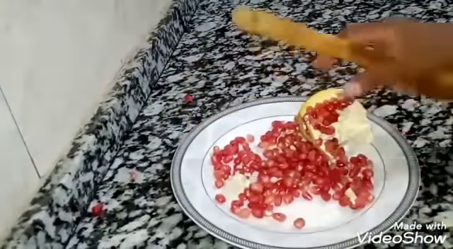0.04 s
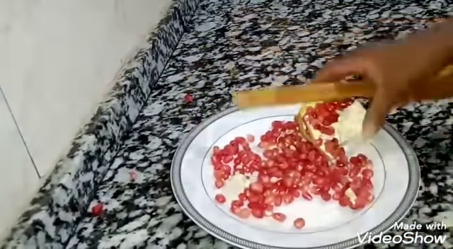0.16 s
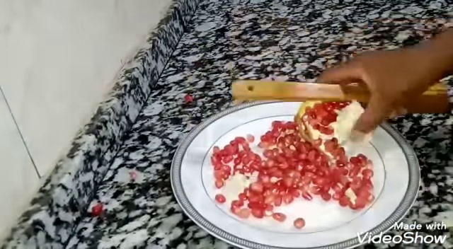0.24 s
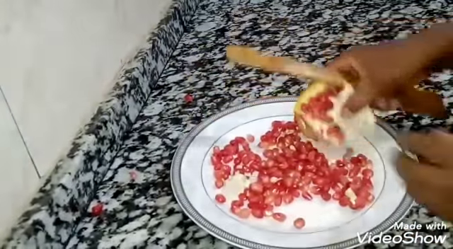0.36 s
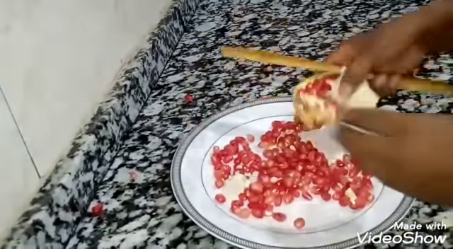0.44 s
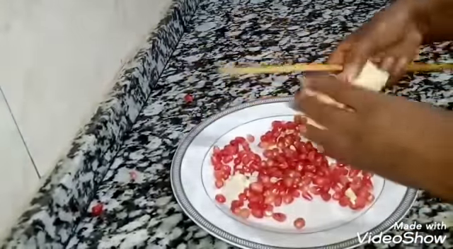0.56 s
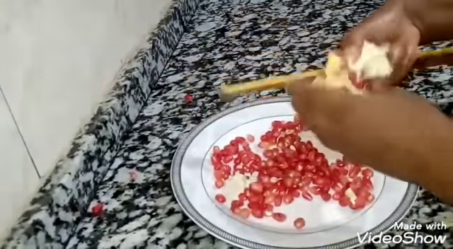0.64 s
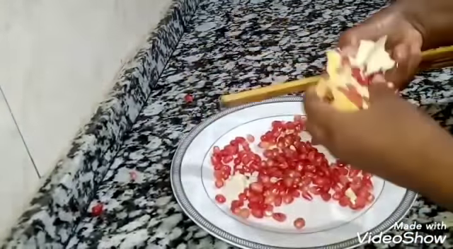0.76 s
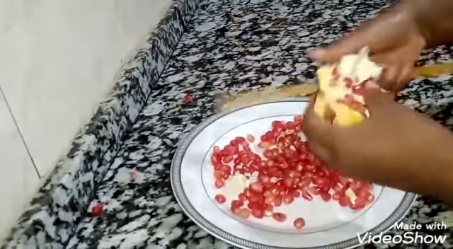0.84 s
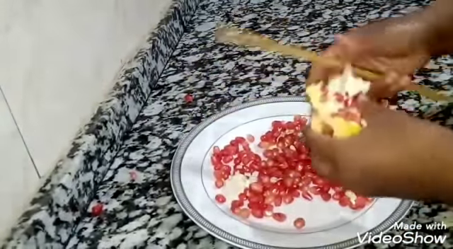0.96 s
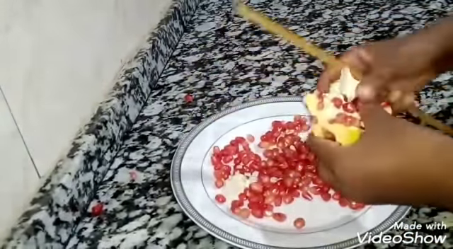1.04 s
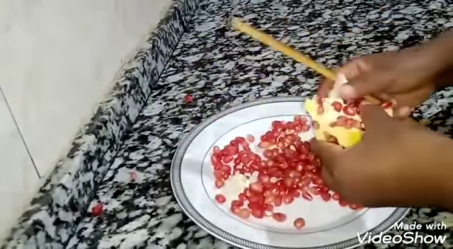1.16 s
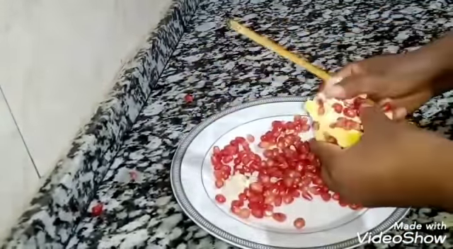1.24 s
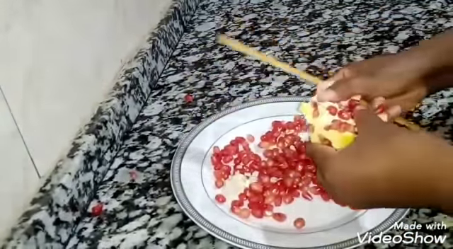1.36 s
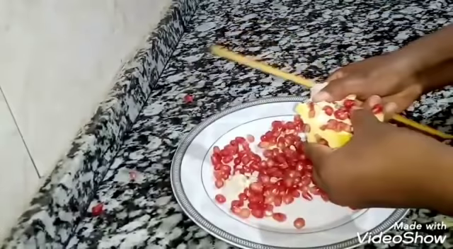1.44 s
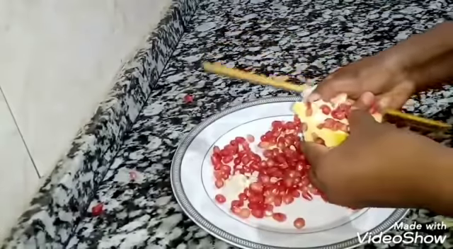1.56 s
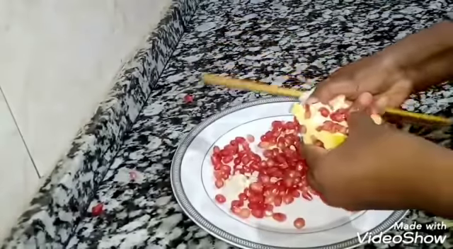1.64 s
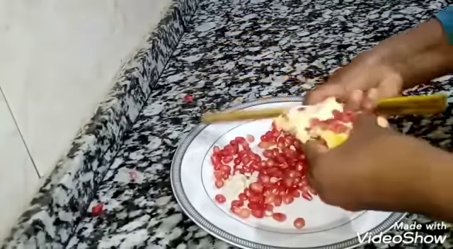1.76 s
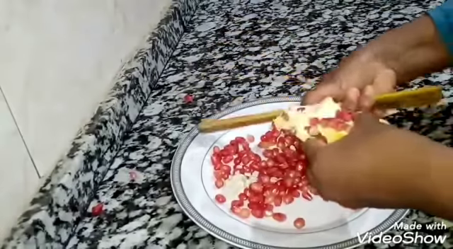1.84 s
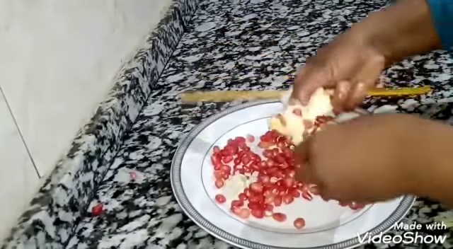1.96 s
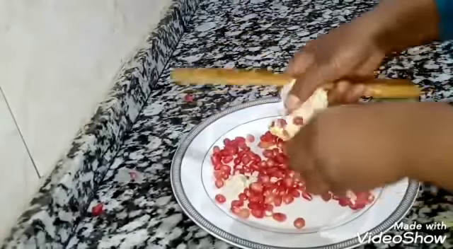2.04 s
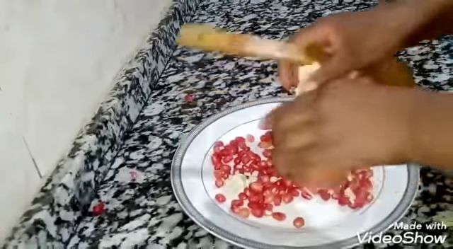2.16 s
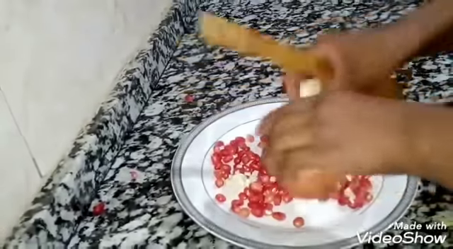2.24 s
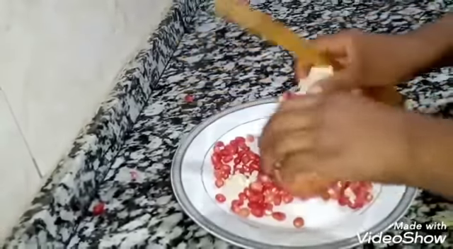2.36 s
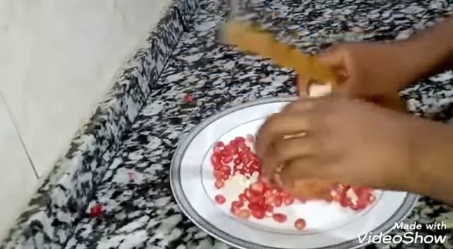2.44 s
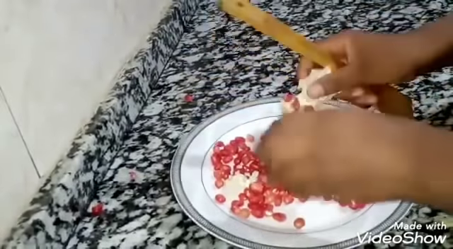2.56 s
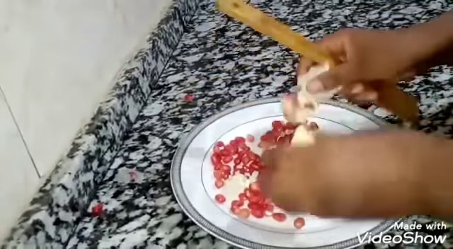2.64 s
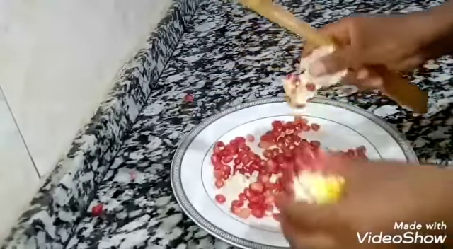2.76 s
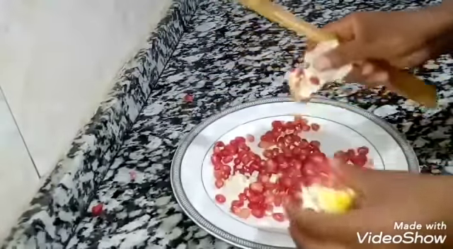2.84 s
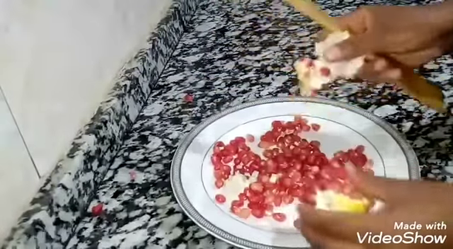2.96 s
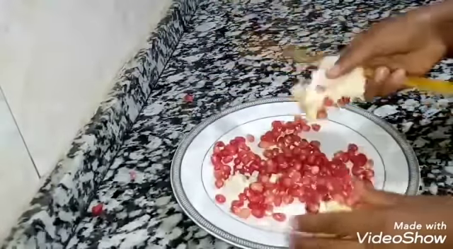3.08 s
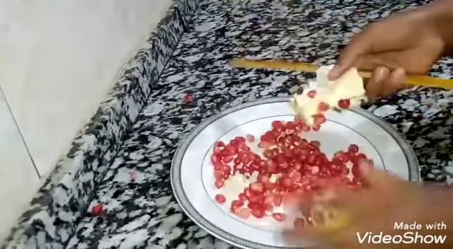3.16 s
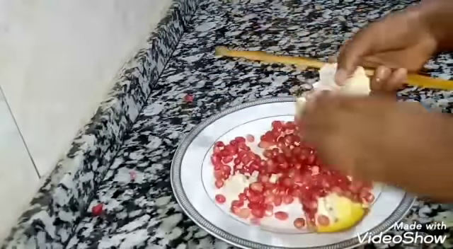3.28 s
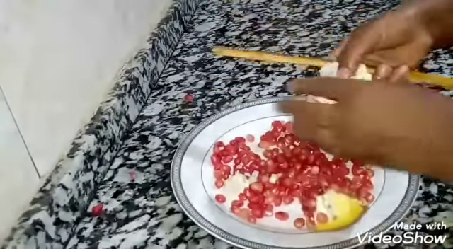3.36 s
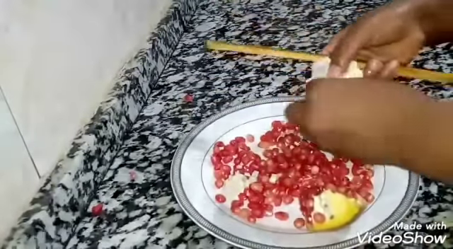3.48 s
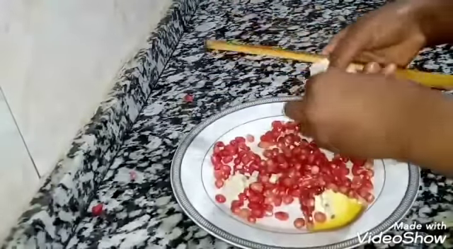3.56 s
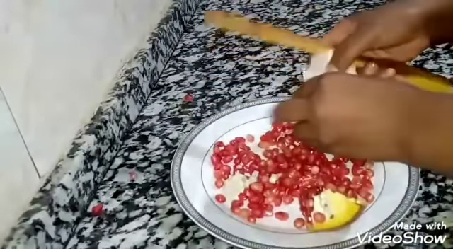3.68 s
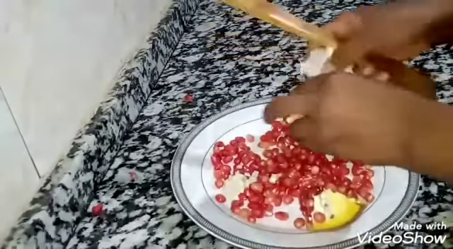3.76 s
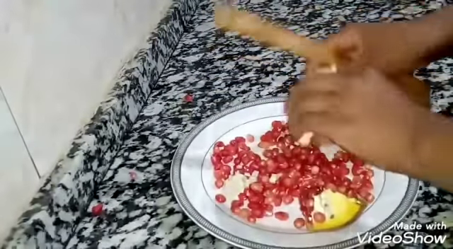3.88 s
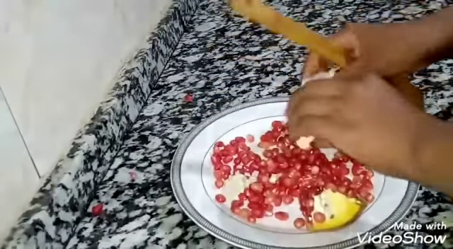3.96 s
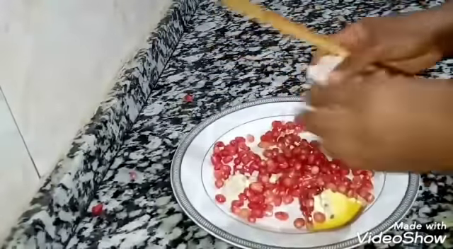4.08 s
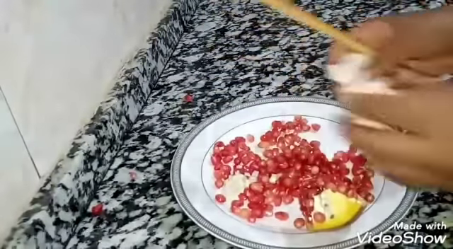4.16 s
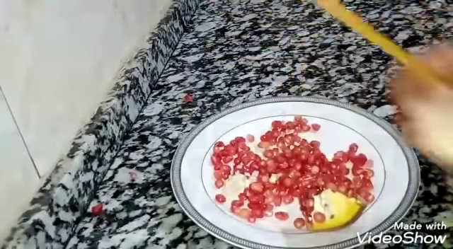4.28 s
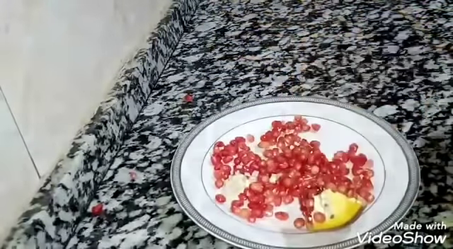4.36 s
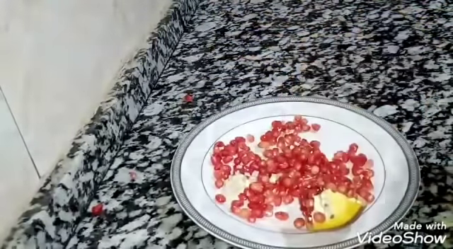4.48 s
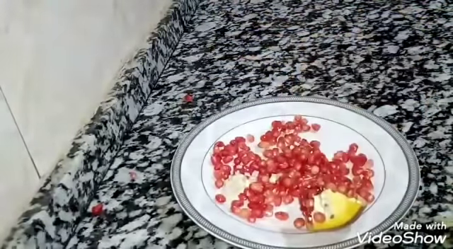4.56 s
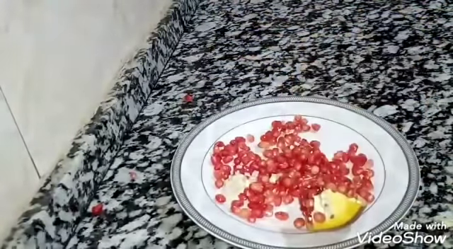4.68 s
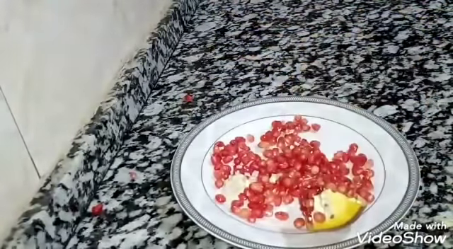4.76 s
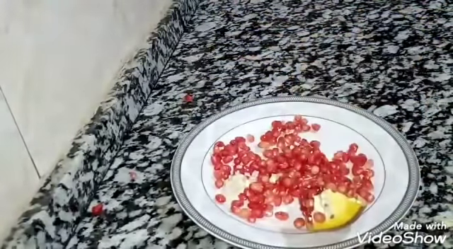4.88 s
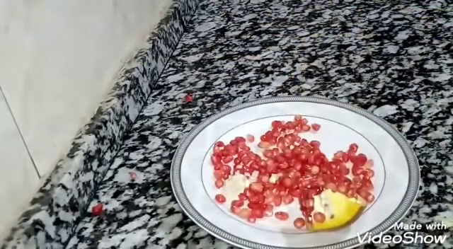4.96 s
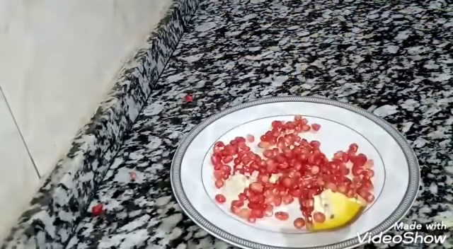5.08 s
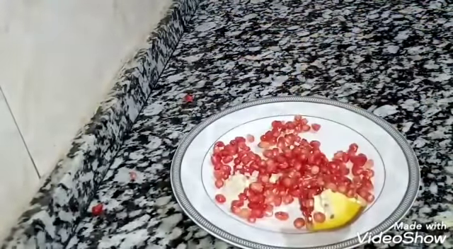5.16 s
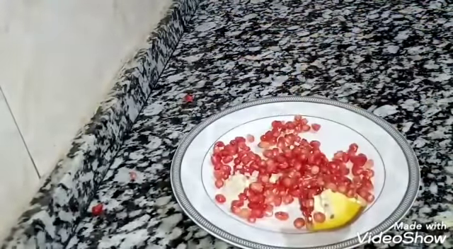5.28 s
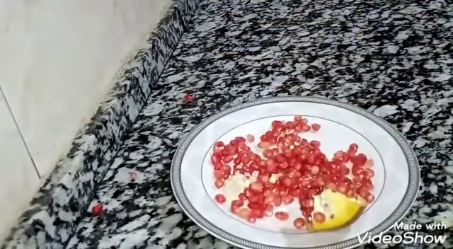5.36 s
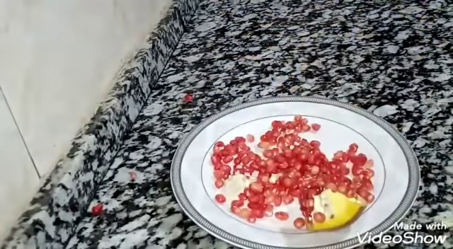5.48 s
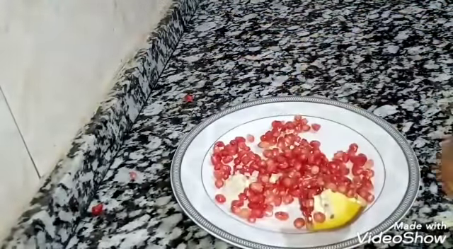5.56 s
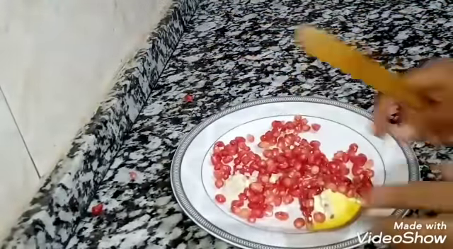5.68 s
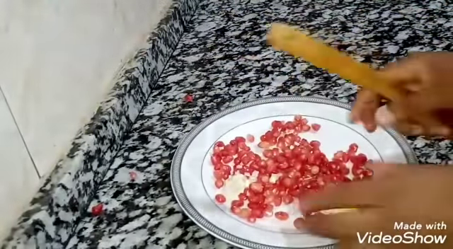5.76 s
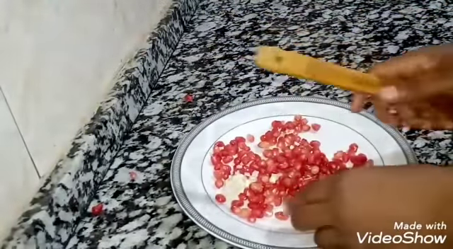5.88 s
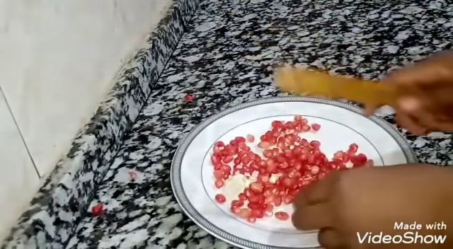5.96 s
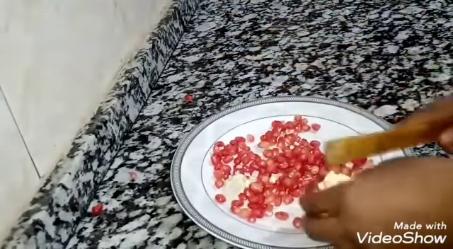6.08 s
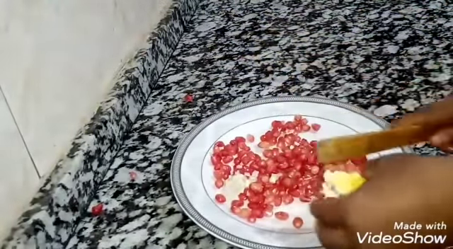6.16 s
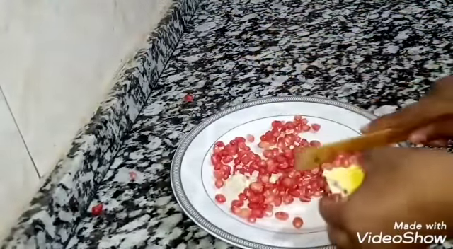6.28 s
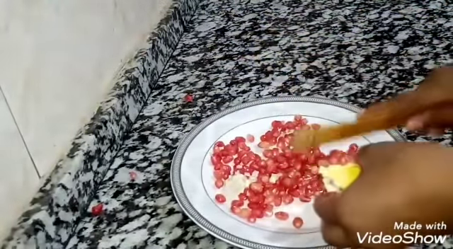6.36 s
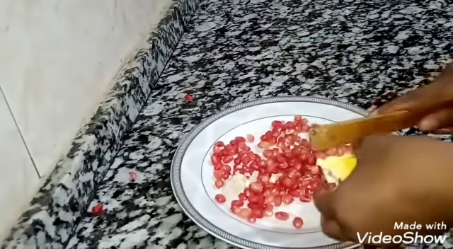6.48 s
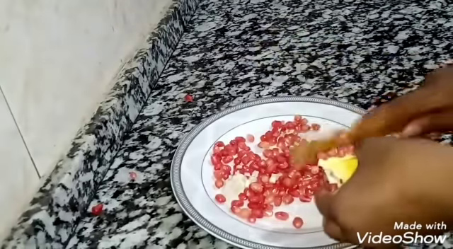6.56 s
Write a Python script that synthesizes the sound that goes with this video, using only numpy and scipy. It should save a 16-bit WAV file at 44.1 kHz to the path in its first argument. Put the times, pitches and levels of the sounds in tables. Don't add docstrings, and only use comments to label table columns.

```python
import sys
import numpy as np
from scipy import signal
from scipy.fft import rfft, irfft
from scipy.io import wavfile
from scipy.ndimage import uniform_filter1d

SR = 44100
rng = np.random.default_rng(int(sys.argv[2]) if len(sys.argv) > 2 else 0)


def unload_audio(sound):
    columns = np.transpose(np.atleast_2d(sound))
    steps = np.round(np.clip(columns, -1, 1) * 32767)
    wavfile.write(sys.argv[1], SR, steps.astype(np.int16))


def gain_from_db(level_db):
    decades = np.asarray(level_db, float) / 20
    return 10 ** decades


N = 291833


def noise(count=N):
    return rng.standard_normal(count)


def unit(x):
    return x / np.sqrt(np.mean(x ** 2))


def band(x, hz, width):
    return signal.lfilter(*signal.iirpeak(hz, hz / width, fs=SR), x)


def walk(rate):
    hold = int(SR / rate)
    held = np.repeat(noise(N // hold + 1), hold)
    return 1.8 * uniform_filter1d(uniform_filter1d(held, hold), hold)[:N]


def bands(modes, flicker_db=3.5):
    total = np.zeros(N)
    for hz, width, db in modes:
        flicker = gain_from_db(db + flicker_db * walk(9))
        total += flicker * unit(band(band(noise(), hz, width), hz, width))
    return unit(total)


def colour(x, points):
    hz, db = np.transpose(points)
    log_hz = np.log(np.maximum(np.arange(N // 2 + 1) * SR / N, 1))
    return irfft(rfft(x) * gain_from_db(np.interp(log_hz, np.log(hz), db)), N)


def swell(s, db, rise_s, fall_s):
    out = np.zeros(N)
    i = np.arange(max(int((s - 2 * rise_s) * SR), 0), min(int((s + 2 * fall_s) * SR), N))
    t = i / SR - s
    out[i] = gain_from_db(db - 30 * np.maximum(-t / rise_s, t / fall_s))
    return out


def swells(rows):
    return sum(swell(*row) for row in rows)


def add(out, s, x, db):
    i = int(s * SR)
    x = x[:N - i]
    out[i:i + len(x)] += x * gain_from_db(db) / np.abs(x).max()


def house():
    # frequency in Hz, level in dB per Hz.
    hiss_points = [(18, -37), (35, -25), (146, -2), (388, -16), (814, -20.5), (1120, -15.5), (1890, -6),
                   (2890, -18), (6900, -12), (9480, -34), (13800, -32), (14900, -24.5), (15900, -24.5),
                   (16300, -47)]
    # centre in Hz, width in Hz, level in dB.
    rumble = [(85.4, 50, -6.5), (147, 37, -2.5), (240.4, 78, -0.5)]
    middle = [(390, 220, -3.5), (623, 230, -6.5), (860, 380, -3)]
    whistle = [(1872, 180, 8.5), (2026, 100, 0.5)]
    # peak in seconds, rumble in dB, middle in dB.
    stirs = [(0.2, -77, -77), (0.419, -73.5, -81.5), (2.45, -71, -85), (2.74, -99, -92),
             (3.239, -72.5, -86), (3.78, -77, -85), (4.351, -79, -95), (4.9, -80, -71.5), (5.0, -81, -102),
             (5.47, -73.5, -79), (5.729, -81, -78), (6.141, -80.5, -113), (6.269, -75, -78)]
    rise_s, fall_s = 0.5, 0.26
    hiss = unit(colour(noise(), hiss_points)) * gain_from_db(-72 + 0.15 * walk(3))
    low = gain_from_db(-81) + swells((s, db, rise_s, fall_s) for s, db, _ in stirs)
    mid = gain_from_db(-78.5) + swells((s, db, rise_s, fall_s) for s, _, db in stirs)
    fan = bands(whistle, 2.5) * gain_from_db(-69 + 0.4 * walk(2.1))
    return hiss + low * bands(rumble) + mid * bands(middle, 3.1) + fan


def counter(blows, wide, rise_s):
    out, t = np.zeros(N), np.arange(SR // 2) / SR
    for s, db, hz, t60 in blows:
        shove = noise(len(t)) * gain_from_db(-60 * t / t60) * np.minimum(t / rise_s, 1)
        add(out, s, band(band(shove, hz, wide * hz), hz, wide * hz), db)
    return out


def thuds():
    # start in seconds, peak in dB, pitch in Hz, t60 in seconds.
    blows = [(.300, -59, 63.4, 0.12), (0.305, -51.5, 140, 0.018), (.31, -59, 352, 0.4),
             (3.225, -58, 1360, 0.13), (0.401, -56, 120, 0.11), (0.689, -52, 523, 0.14),
             (1.258, -56, 318, 0.2), (1.548, -44, 990, 0.14), (1.769, -45, 423, 0.058),
             (2.043, -52.5, 510, 0.35), (2.451, -33.5, 538, 0.12), (2.778, -59.5, 420, 0.19),
             (3.612, -60, 139, 0.11), (4.847, -57.5, 149, 0.42), (4.922, -71, 152.6, .28),
             (4.93, -57.5, 354, 0.17), (5.698, -60.5, 390, 0.66), (6.146, -63, 109, 0.41),
             (6.279, -59, 114, 0.21), (6.59, -52, 460, 0.4), (2.455, -53, 1900, 0.31)]
    return counter(blows, wide=0.35, rise_s=0.0093)


def hums():
    # start in seconds, peak in dB, pitch in Hz, t60 in seconds.
    blows = [(1.175, -52, 4400, .16), (2.456, -34, 1500, .17), (.345, -44, 1700, .12),
             (0.54, -59, 2090, 0.92), (0.57, -60, 740, 0.25), (3.087, -53, 135, 0.43),
             (3.09, -58.5, 1206, 0.19), (2.452, -40, 498, 0.28), (3.614, -53, 1020, 0.24),
             (1.55, -55.5, 540, 0.2), (.36, -55.5, 890, 0.114)]
    return counter(blows, wide=0.34, rise_s=0.00086)


def clear_knocks():
    # start in seconds, peak in dB, pitch in Hz, t60 in seconds.
    blows = [(2.1285, -41, 1650, 0.054), (2.3435, -49, 1660, .05), (3.082, -43, 1780, 0.025),
             (.592, -40, 2130, 0.022), (.592, -49, 3220, .03), (5.905, -65, 3500, 0.31),
             (2.518, -47, 545, .3), (.5925, -47, 395, 0.11), (.5935, -57, 125, 0.3),
             (.61, -59.5, 388, 0.61), (.675, -54, 690, 0.24), (.68, -58, 830, 0.66),
             (.70, -60.5, 480, 0.33)]
    out, t = np.zeros(N), np.arange(SR // 2) / SR
    for s, db, hz, t60 in blows:
        waver = unit(uniform_filter1d(uniform_filter1d(noise(len(t)), size=500), size=500))
        note = np.sin(2 * np.pi * np.cumsum(hz * (1 + 0.02 * waver)) / SR)
        onset = np.minimum(t * hz / 2, 1)
        add(out, s, note * gain_from_db(-60 * t / t60) * onset, db)
    return out


def slaps():
    # start in seconds, peak in dB, contact in ms.
    hits = [
        (2.4505, -23.5, 0.44),
        (2.4531, -30, 0.26),
        (2.457, -20.5, 0.52),
        (2.467, -31, .4),
        (3.0835, -58, .35),
    ]
    out, t_ms = np.zeros(N), np.arange(900) * 1000 / SR
    for s, db, contact_ms in hits:
        push = -np.sin(np.pi * np.minimum(t_ms / contact_ms, 1)) ** 2
        add(out, s, band(push, 1400, 2500), db)
    return out


def drag():
    # peak in seconds, squeal in dB, rise in seconds, fall in seconds, body re squeal in dB.
    strokes = [
        (0.594, -58, 0.0037, 0.2, -13),
        (0.69, -61, 0.27, 0.19, -4),
        (0.851, -65, 0.34, 0.36, -1.5),
        (5.74, -74.5, .5, 0.35, -5),
    ]
    # centre in Hz, width in Hz, level in dB.
    squeal = [(2230, 600, 1.5), (3300, 500, -7), (4100, 600, -4)]
    body = [(420, 130, -2.5), (781, 210, -1)]
    squeal_gain = swells(row[:4] for row in strokes)
    body_gain = sum(swell(*row[:4]) * gain_from_db(row[4]) for row in strokes)
    return squeal_gain * bands(squeal, 1.1) + body_gain * bands(body, 1.3)


def squeak():
    # peak in seconds, level in dB, rise in seconds, fall in seconds.
    rubs = [
        (5.76, -71.5, 0.32, 0.2),
        (5.925, -67, 0.069, 0.055),
    ]
    return swells(rubs) * bands([(2620, 590, -3.0), (3484, 80, 0.0), (4360, 520, -4)], 3.6)


def rustle():
    # peak in seconds, level in dB, rise in seconds, fall in seconds.
    touches = [(0.233, -62, 0.031, 0.4), (0.765, -69.5, 0.053, 0.36), (.85, -76, 0.22, 0.037),
               (1.171, -72, 0.029, 0.3), (1.255, -70, 0.027, 0.082), (1.5, -69, 0.0066, 0.0089),
               (1.54, -50, 0.044, 0.019), (2.348, -66.5, 0.011, 0.13), (2.437, -65, 0.043, 0.05),
               (2.466, -59.5, 0.012, .16), (3.087, -60, 0.058, 0.16), (3.473, -64.5, 0.05, 0.12),
               (3.56, -48.5, 0.029, 0.25), (3.63, -60.5, .02, 0.154), (4.82, -73, 0.05, 0.046),
               (4.922, -64, 0.063, 0.038), (5.746, -76.5, 0.35, 0.24), (5.92, -76, 0.33, 0.11),
               (6.25, -64, 0.16, 0.089), (6.548, -61, 0.059, 0.29)]
    grains = noise() * gain_from_db(1.7 * rng.exponential(size=N) + 2.4 * walk(90))
    for hz, width in [(5000, 2600), (5800, 3000), (6300, 3200), (6600, 3600)]:
        grains = band(grains, hz, width)
    return unit(grains) * swells(touches)


def plate(hits, mode_hz, modes, clack_hz, clack_width, clack_db, rough, longest_s):
    out, t = np.zeros(N), np.arange(SR // 3) / SR
    hz = np.array(mode_hz)[:, None]
    db, t60 = np.array(modes).T[:, :, None]
    decay = gain_from_db(-60 * t / np.clip(t60, 0.02, longest_s))
    for s, peak_db, bass_db, treble_db in hits:
        level_spot, pitch_spot = rng.standard_normal((2, len(modes), 1))
        tilt_db = np.interp(hz, [800, 1100, 2200, 2600], [bass_db, 0, 0, treble_db])
        share = gain_from_db(db + 1.5 * level_spot + tilt_db)
        ring = np.sin(2 * np.pi * hz * (1 + 0.003 * pitch_spot) * t) * decay
        chatter = 1 + rough * unit(uniform_filter1d(rng.standard_normal(ring.shape), size=300, axis=1))
        rung = (share * ring * chatter).sum(axis=0)
        rattle = noise(len(t)) * np.exp(-t * 1000 / 1.7)
        clack = band(band(rattle, clack_hz, clack_width), clack_hz, clack_width)
        onset = np.minimum(t / 0.00039, 1) ** 2
        add(out, s, (rung + gain_from_db(clack_db) * clack) * onset, peak_db)
    return out


def falling_seeds():
    # start in seconds, peak in dB, bass tilt in dB, treble tilt in dB.
    hits = [
        (1.914, -48.5, -17, 7),
        (2.012, -44.5, -7.5, -6),
        (2.044, -46.5, -33, -3.5),
        (2.060, -45, -1, -18),
        (2.071, -49, 17, 2),
        (2.128, -40.5, -32, -21),
        (2.166, -67, -16, -5),
        (2.344, -44.5, -3, -34),
        (3.081, -46.5, -11, -7),
        (3.222, -55, -17, -11),
    ]
    heap_hz = [415, 500, 580, 665, 1200, 1380, 1555, 1660, 1900, 2690, 2730, 3870, 4400]
    # level in dB, t60 in seconds.
    heap = [(-0.5, 0.11), (3.5, 0.35), (1.5, 0.22), (-27, 0.3), (-3, 0.06), (-2, 0.049), (6.5, 0.11),
            (11.5, 0.054), (2.5, 0.056), (-7, 0.11), (4.5, 0.1), (-21, 0.3), (-8, 0.04)]
    return plate(hits, heap_hz, heap, 1760, 510, clack_db=7.5, rough=0.44, longest_s=0.28)


def falling_rind():
    # start in seconds, peak in dB, bass tilt in dB, treble tilt in dB.
    hits = [
        (1.750, -32.5, -6.5, -12),
        (1.773, -56, 13, -12),
        (2.4485, -37, -12, 5),
        (2.451, -26.5, 0, 4),
        (2.457, -24, 4.5, -3.5),
        (2.469, -32.5, -2, -3),
        (2.478, -38.5, 14, 11),
        (2.520, -39.5, 3, -20),
        (3.083, -42, -9, -0.5),
    ]
    rim_hz = [440, 538, 586, 720, 900, 1045, 1212, 1260, 1475, 1560, 1688, 1865, 2050, 2690, 2749, 3540,
              4390, 4865, 5340, 6374, 7500, 8576, 10000]
    # level in dB, t60 in seconds.
    rim = [(-4.5, 0.11), (5.5, 0.14), (-4, 0.073), (-5, 0.05), (-29, 0.056), (5, 0.082), (1.5, 0.16),
           (-15.5, 0.09), (0, 0.1), (-2, 0.146), (1, 0.18), (-9.5, 0.071), (-1, 0.16), (2.5, 0.11),
           (5, 0.1), (-16, 0.28), (-4, 0.16), (-9, 0.22), (-15, 0.29), (-9.5, 0.38), (-12, 0.3),
           (-12.5, 0.15), (-20, 0.23)]
    return plate(hits, rim_hz, rim, 1880, 1300, clack_db=12.5, rough=0.89, longest_s=0.33)


def spits():
    # start in seconds, peak in dB.
    clicks = [(0.3058, -48.5), (0.3228, -46.5), (0.3335, -38.5), (0.3555, -40.5), (1.791, -49.5),
              (1.2355, -45), (1.2522, -45.5), (1.4958, -61), (1.5473, -44), (1.7507, -50.5), (3.6108, -52),
              (6.577, -50), (6.5982, -52.5)]
    out, t = np.zeros(N), np.arange(512) / SR
    for s, db in clicks:
        add(out, s, band(noise(512) * np.exp(-t / 0.002), 13500, 6000), db)
    return out


def rind_knock(x, hz, width):
    return band(band(band(x, hz, width), hz, width), hz, 3.2 * width)


def cracks():
    # peak time in seconds, peak in dB, rind re peak in dB, rind in Hz.
    rip = [(0.2313, -45.5, -14.5, 2600), (0.272, -53, -15, 2608), (0.3054, -27, -9, 2693),
           (0.3135, -26.5, -11.5, 3300), (0.3178, -26.5, -14, 2498), (0.3233, -26, -8, 3704),
           (0.3335, -13, -16, 2400), (0.3352, -27, -3, 2493), (0.3384, -28.5, -2.5, 3510),
           (0.3413, -20, -18, 2600), (0.3435, -30.5, -8.5, 2800), (0.3485, -31, -7, 2400),
           (0.352, -31.5, -6, 2000), (0.3535, -31.5, -9, 3400), (0.3564, -31.5, -6.5, 2192),
           (0.3577, -29.5, -6, 3600), (0.36, -33.5, -8.5, 2400), (0.3624, -24.5, -10.5, 3200)]
    # peak time in seconds, peak in dB, bright ring in Hz, rind re peak in dB.
    ribs = [(1.5433, -41.5, 6500, 0), (1.5444, -29.5, 7200, -4), (1.547, -23.5, 5010, -0.5),
            (1.5488, -27.5, 5500, -1.5), (1.549, -32, 6056, 2.5), (1.553, -32.5, 4900, -10),
            (1.5546, -36.5, 5130, -3), (1.7502, -21.5, 4950, -12), (1.7518, -25, 5330, -13),
            (1.7513, -30, 4800, -5), (1.7557, -24.5, 5250, -11.5), (1.756, -32, 5150, -2.5),
            (1.773, -23.5, 5990, -14), (1.7742, -27.5, 7400, -12.5), (1.7761, -28, 5570, -0.5),
            (1.7773, -41, 5320, -5), (3.5379, -28, 6190, -14), (3.538, -29, 5130, -9),
            (3.5421, -35.5, 4760, -16), (3.5475, -42, 5500, -5), (3.5551, -48, 6700, 1),
            (3.6111, -27, 6310, -10), (3.6125, -27, 6100, -8), (3.6127, -26, 5976, 0),
            (3.6172, -41, 6500, -12), (3.6283, -32.5, 5500, -11), (3.6354, -40, 6070, -9)]
    # peak time in seconds, peak in dB, bright ring in Hz, rind re peak in dB, rind in Hz.
    ticks = [(0.5935, -51.5, 3250, 9, 2190), (1.472, -51.5, 6870, -10, 2400),
             (1.4961, -43.5, 7340, -20, 2360), (1.6578, -41.5, 5400, -0.5, 3470),
             (1.6595, -45, 6570, -4, 2700), (1.7038, -45.5, 6920, 1, 5300), (2.2622, -42, 7280, -38, 2350),
             (2.345, -51, 5880, -17, 2420), (3.0843, -52.5, 6150, 11, 1800), (3.096, -60, 5120, -7, 2400),
             (3.4692, -48, 6340, -8, 4530), (3.7328, -53, 6200, -3, 2400), (4.8246, -55, 5290, -8.5, 2370),
             (4.9158, -51.5, 6420, -3, 4000), (5.912, -62, 4150, 4, 2395), (6.2155, -67, 6040, -12, 2400),
             (6.2325, -63, 5870, -1, 2400)]
    peel = [(1.1639, -46.5, 6730, -9, 4570), (1.1706, -46.5, 6830, -12, 4500), (1.1771, -63, 6800, 4, 4350),
            (1.1805, -56, 6940, -3, 4400), (1.184, -51, 6720, 0, 4400), (1.1985, -53, 6630, -8, 4440),
            (1.2016, -52, 6370, -3, 4600), (1.2114, -52, 6600, -12, 4400), (1.2247, -49, 6420, -13, 4600),
            (1.2354, -37, 6500, -12, 4700), (1.244, -47, 6160, -8, 4600), (1.2515, -36, 6000, -6, 4100),
            (1.2539, -38, 6110, -6, 3000), (1.2543, -47, 6290, -8, 3400), (1.2699, -46, 6370, -12, 3000),
            (1.272, -40.5, 5810, 0, 2400), (1.2753, -39, 4500, -11, 2300), (1.2757, -39, 6700, -2, 3600),
            (1.2779, -33, 6630, -6, 1960), (1.2816, -37, 5940, -15, 2000), (1.2899, -36.5, 6180, -5, 3190),
            (1.291, -47, 6640, -9, 3600), (1.2976, -48, 6210, -2, 3500), (1.3183, -35, 6590, 1.5, 2400),
            (1.3208, -44.5, 6710, 3, 1920), (1.3286, -46, 6970, 7.5, 3600), (1.331, -47.5, 6150, 5, 2310),
            (1.3336, -47.5, 5470, 6, 2800), (6.5424, -39.5, 6370, -34.5, 2400), (6.568, -43, 6330, 0, 2150),
            (6.5753, -36.5, 6490, -6, 2630), (6.578, -38, 5220, -6, 2930), (6.5793, -39, 6260, -5, 2840),
            (6.584, -42, 6240, -0.5, 1980), (6.5887, -48, 6660, -16, 2400), (6.5989, -39.5, 6275, 8, 2320),
            (6.6006, -49, 5700, 14, 2130), (6.6054, -39, 6000, 2, 2280), (6.6078, -47, 6720, -2, 2630),
            (6.6112, -44, 6400, -4, 2150)]

    # rind width as a share of its pitch, tear time in ms, level at the walls in dB.
    rows = [(s, db, 6185, rind_db, rind_hz, 0.84, 0.17, -4) for s, db, rind_db, rind_hz in rip]
    rows += [(*row, 2380, 1, 0.17, 2) for row in ribs]
    rows += [(*row, 0.45, 0.27, -2) for row in ticks]
    rows += [(*row, 1, 0.17, 3) for row in peel]

    out, walls, t = np.zeros(N), np.zeros(N), np.arange(512) / SR
    for s, db, hz, rind_db, rind_hz, wide, tear_ms, walls_db in rows:
        tear, bend, spray = rng.standard_normal((3, 512))
        hz = hz * (1 + 0.012 * spray[-1])
        rind_width = wide * rind_hz
        shape = (t * 1000 / tear_ms) ** 2 * np.exp(-t * 1000 / tear_ms)

        ripping = (np.sin(2 * np.pi * hz * t) + 0.35 * tear) * shape
        fibres = band(band(ripping, hz, 3000), hz, 6000)
        start = s - np.abs(fibres).argmax() / SR
        add(out, start, fibres + gain_from_db(-35.5) * tear * shape, db)

        bending = (np.sin(2 * np.pi * rind_hz * t) + 0.9 * bend) * shape
        lag_s = 0.0005
        add(out, start + lag_s, rind_knock(bending, rind_hz, rind_width), db + rind_db)

        puff = spray * np.exp(-t / 0.00025)
        add(walls, start, band(band(puff, hz, 3600), hz, 7000), db + walls_db + 2.5)
        add(walls, start, rind_knock(puff, rind_hz, rind_width), db + rind_db + walls_db - 2)
    return out, walls


def kitchen(x):
    # centre in Hz, t60 in seconds, level in dB.
    echoes = [(405, 0.32, -10), (1060, 0.25, -13), (2050, 0.31, -13.5), (3570, .3, -10), (5100, 0.28, -9),
              (6500, 0.15, -16.5), (9610, 0.12, -13.5), (15190, 0.048, 6.5)]
    t = np.arange(SR // 2) / SR
    tail = np.zeros(len(t))
    for hz, t60, db in echoes:
        tail += gain_from_db(db - 31.0 - 60 * t / t60) * unit(band(noise(len(t)), hz, 0.96 * hz))
    rise = np.clip((t - 0.001) / 0.004, 0, 1)
    return signal.fftconvolve(x, tail * rise)[:N]


def microphone(x):
    # frequency in Hz, gain in dB.
    response = [(20, -22.5), (200, -2), (400, -2.5), (3500, 0.5), (6300, 0.5), (7400, 2), (8700, -4),
                (11500, -11), (14000, -13.5), (15500, 4.5), (16400, -27.5)]
    return colour(x, response)


def scene():
    snaps, scattered = cracks()
    rind, seeds = falling_rind(), falling_seeds()
    echoes = kitchen(scattered + gain_from_db(-6.5) * rind + gain_from_db(-2.5) * seeds)
    near = microphone(snaps + rind + seeds + echoes)
    slab = thuds() + hums() + clear_knocks() + slaps()
    hands = drag() + rustle() + squeak()
    return (near + slab + hands + house() + spits())[None]


def starve(x, low_hz, high_hz, share):
    f, _, z = signal.stft(x, SR, nperseg=2048)
    for lo in np.arange(low_hz, high_hz, 86.0):
        rows = (f >= lo) & (f < lo + 86)
        whim = gain_from_db(9 * uniform_filter1d(noise(z.shape[1]), size=2))
        need = np.sum(np.abs(z[rows]) ** 2, axis=0) * whim
        z[rows] *= np.where(need < np.quantile(need, share), 0.12, 1)
    return signal.istft(z, SR, nperseg=2048)[1][:N]


def shut(moments):
    t = np.arange(N) / SR
    return np.prod([np.clip(np.abs(t - s) * 4000 / ms - 1.5, 0.05, 1) for s, ms in moments], axis=0)


def gaps(x):
    # centre in seconds, length in ms.
    bass_gaps = [
        (.317, 8.9),
        (.342, 4.6),
        (1.2435, 13),
        (1.477, 3.5),
        (1.642, 11),
    ]
    treble_gaps = [(.3095, 4), (.327, 3), (.341, 6.4), (1.222, 5), (1.246, 6), (1.261, 4), (1.53, 14),
                   (1.64, 12), (1.757, 6.1), (3.562, 29), (6.552, 6)]
    full_gaps = [
        (.295, 9),
        (1.219, 1.3),
        (1.733, 4.9),
        (2.248, 3.9),
        (3.521, 3.9),
        (6.536, 0.69),
    ]
    bass = signal.sosfiltfilt(signal.butter(4, 1250, fs=SR, output="sos"), x)
    top = signal.sosfiltfilt(signal.butter(6, 9000, "high", fs=SR, output="sos"), x)
    x = x - bass * (1 - shut(bass_gaps)) - top * (1 - shut(treble_gaps))
    return x * shut(full_gaps)


def roll_off(x):
    return signal.sosfilt(signal.butter(12, 16200, fs=SR, output="sos"), x)


def record(dry):
    x = starve(dry[0], 4300, 7900, share=0.55)
    x = starve(x, 2300, 4300, share=0.3)
    x = starve(x, 950, 1700, share=0.2)
    mix = gaps(x)[None]
    return roll_off(mix)


dry = scene()
out = record(dry)
unload_audio(out)
```